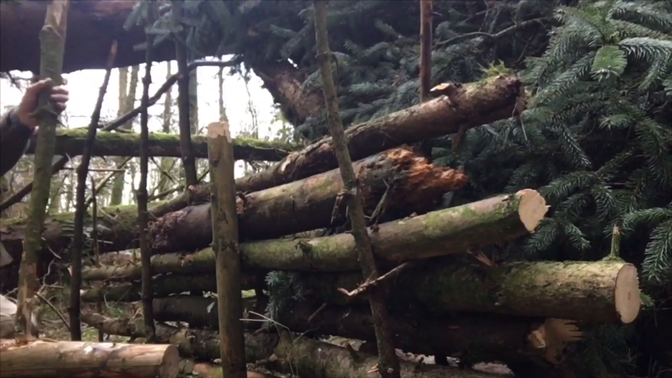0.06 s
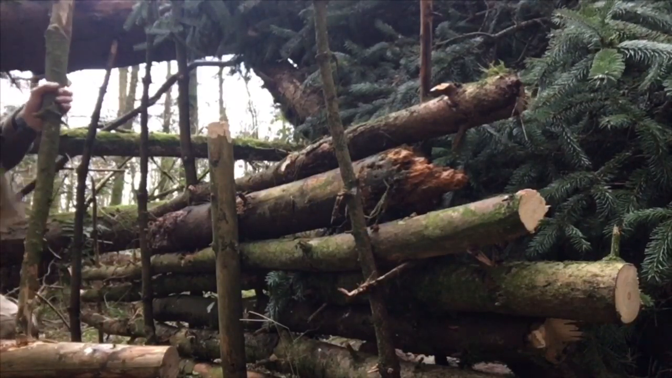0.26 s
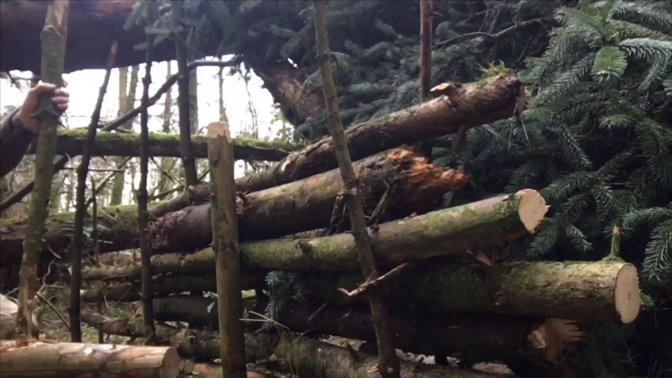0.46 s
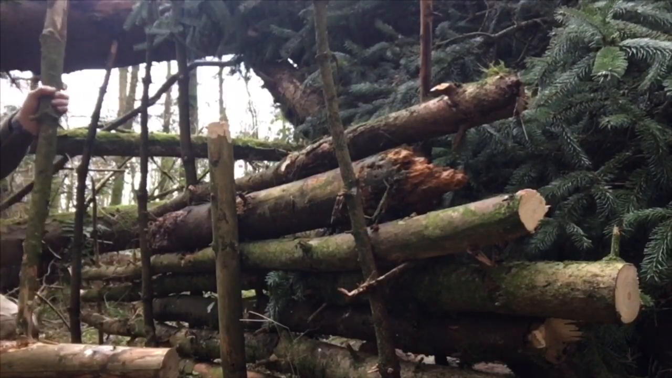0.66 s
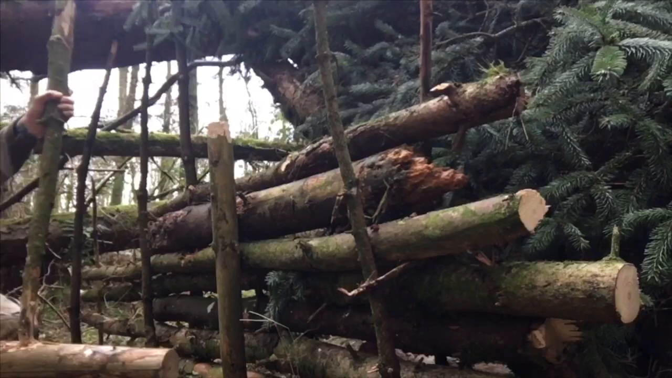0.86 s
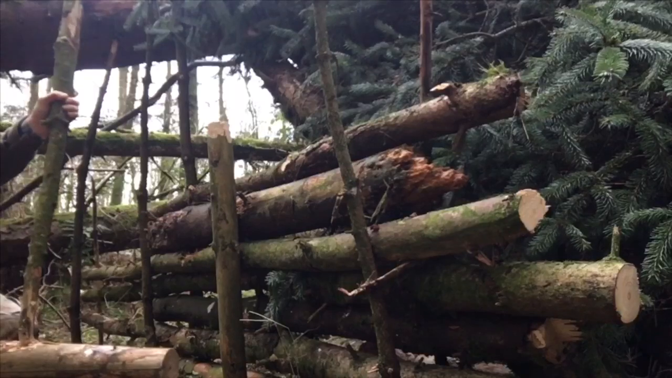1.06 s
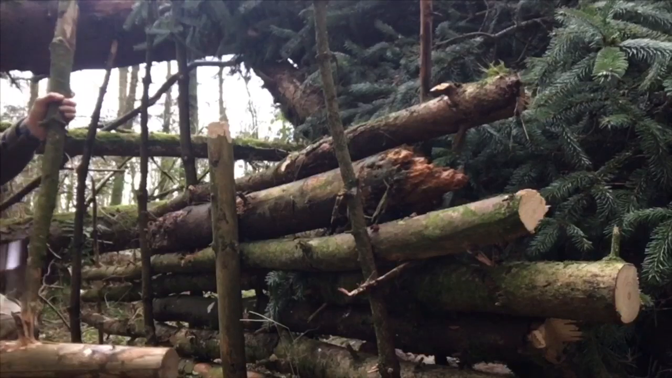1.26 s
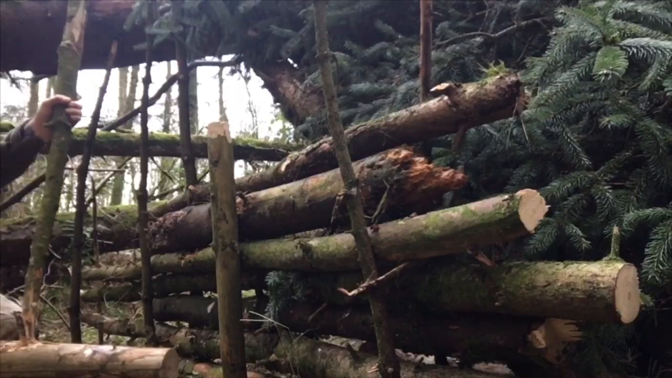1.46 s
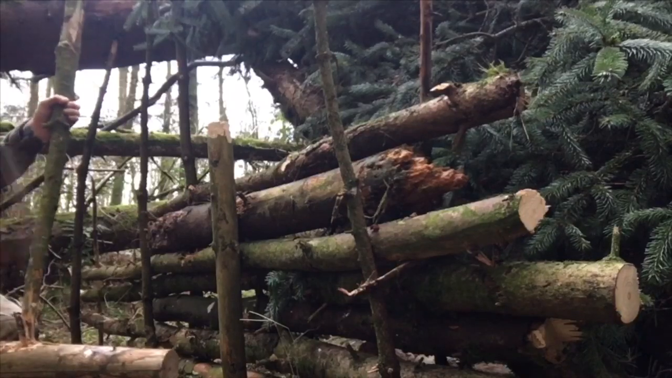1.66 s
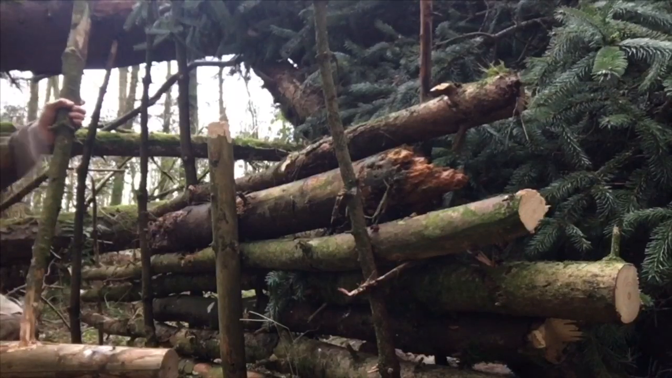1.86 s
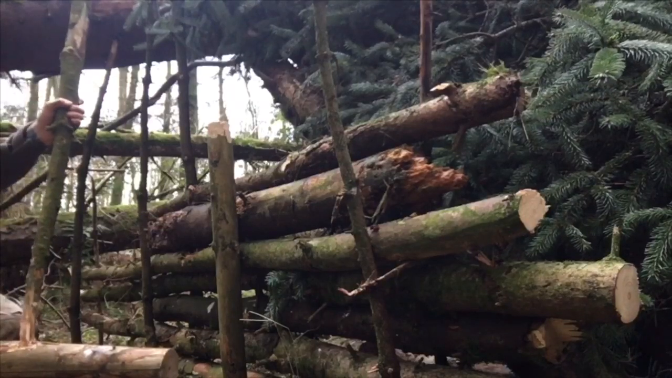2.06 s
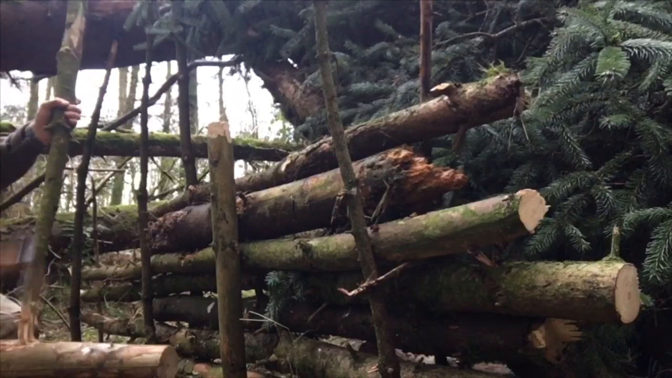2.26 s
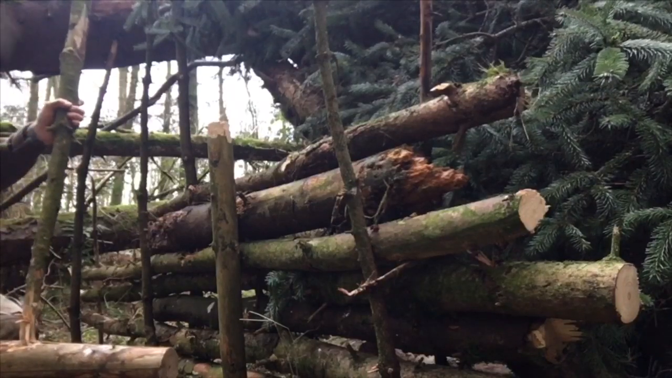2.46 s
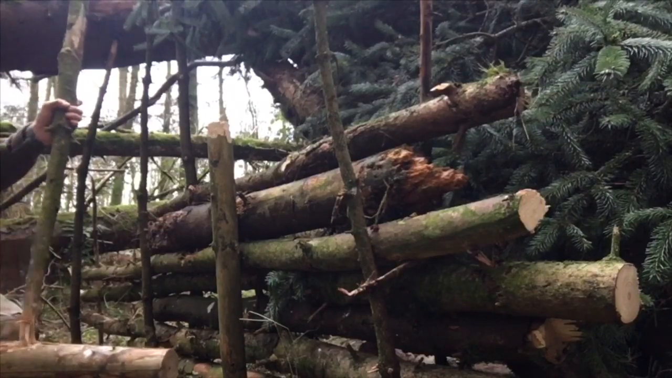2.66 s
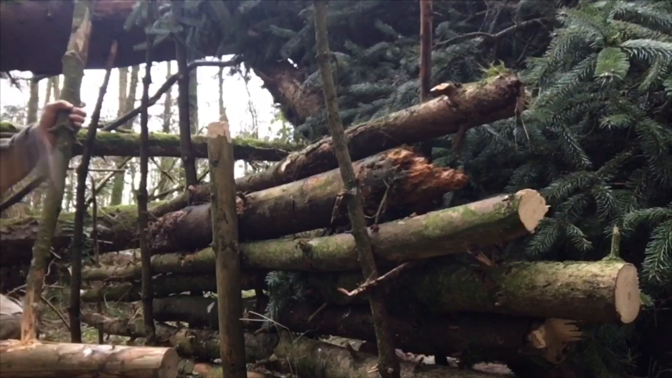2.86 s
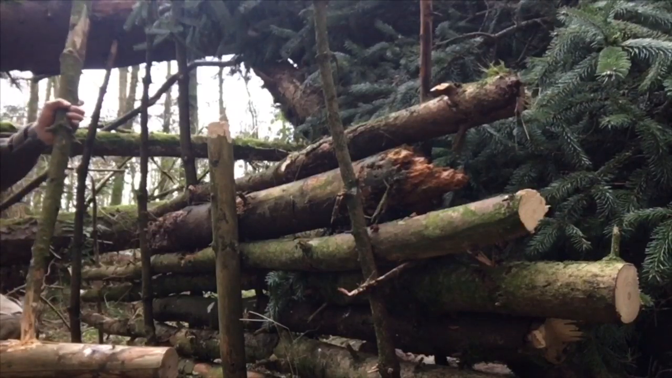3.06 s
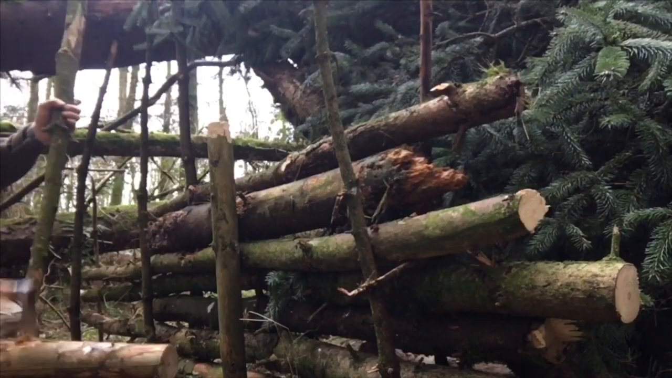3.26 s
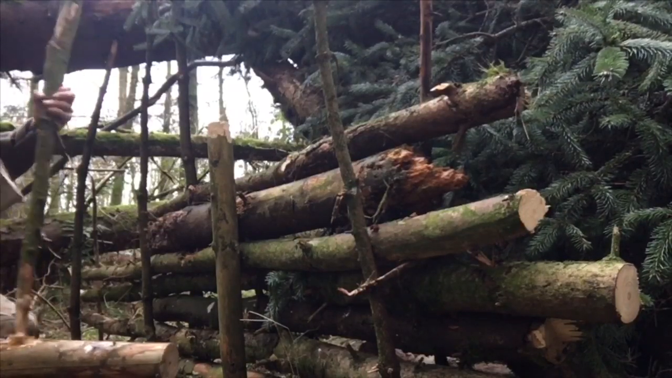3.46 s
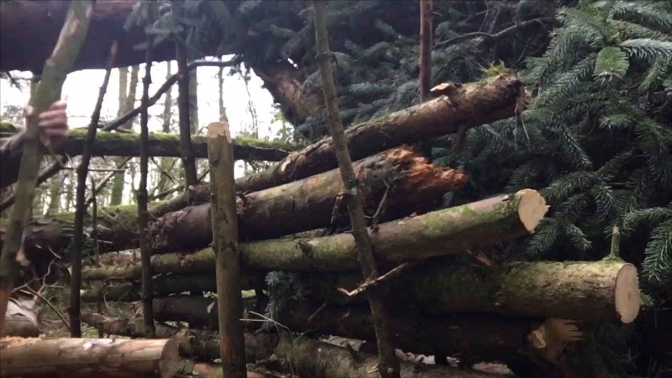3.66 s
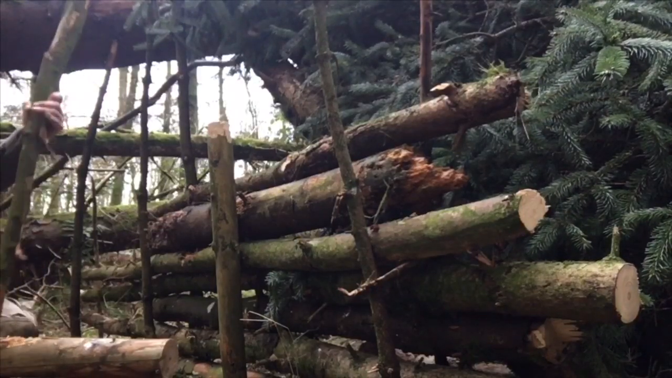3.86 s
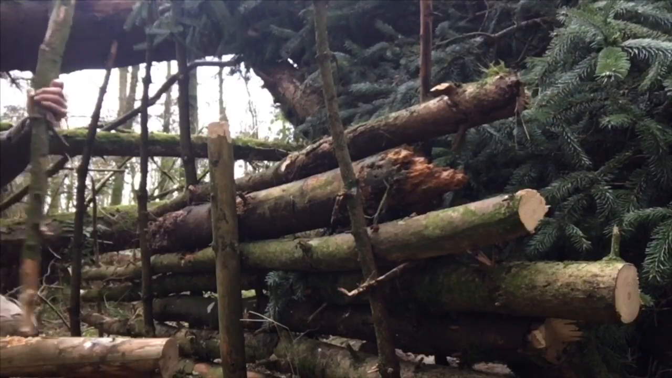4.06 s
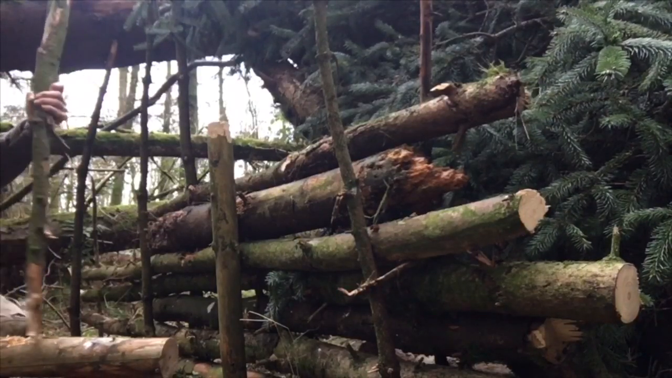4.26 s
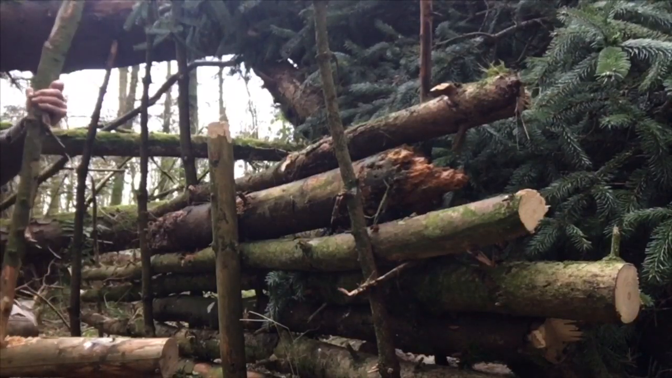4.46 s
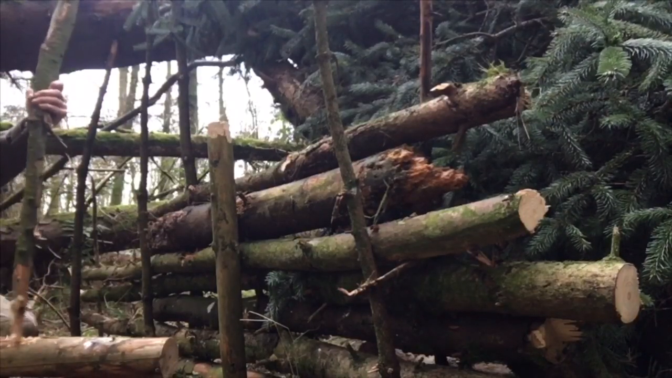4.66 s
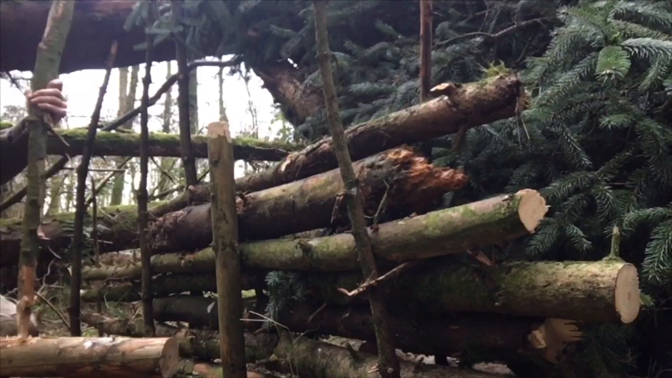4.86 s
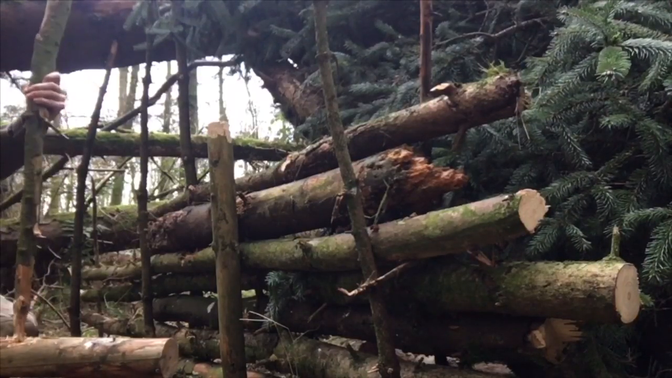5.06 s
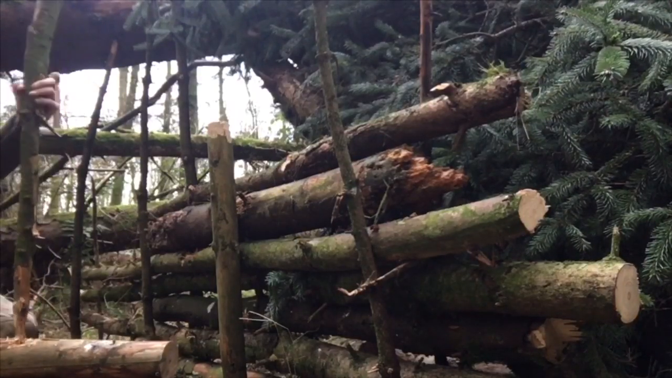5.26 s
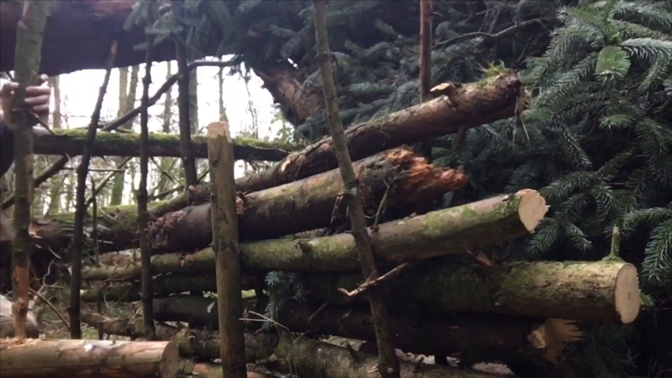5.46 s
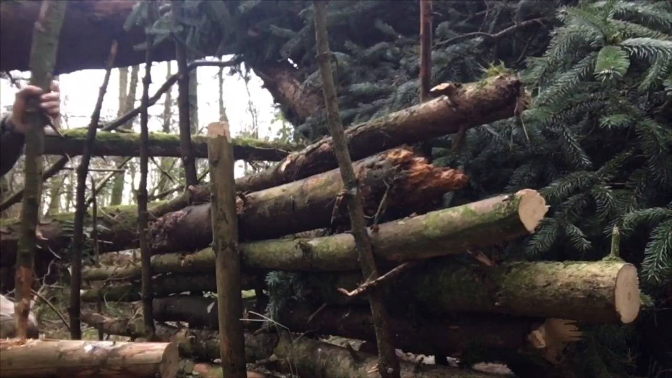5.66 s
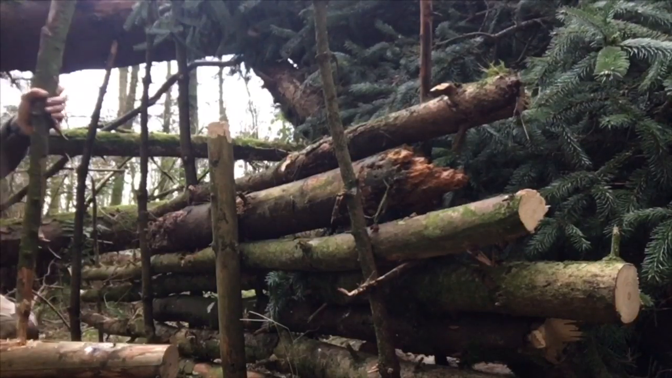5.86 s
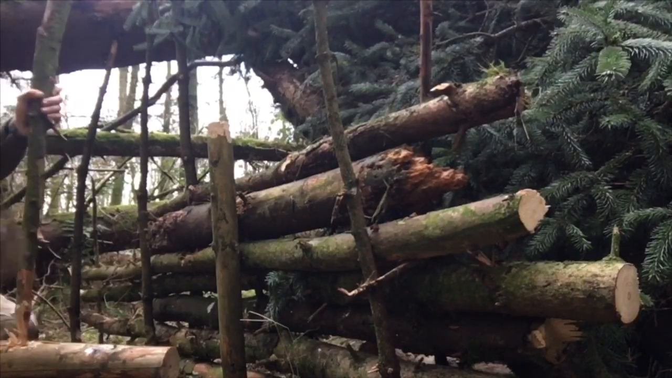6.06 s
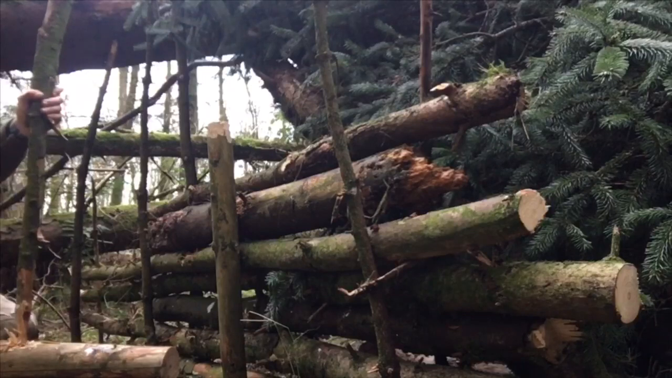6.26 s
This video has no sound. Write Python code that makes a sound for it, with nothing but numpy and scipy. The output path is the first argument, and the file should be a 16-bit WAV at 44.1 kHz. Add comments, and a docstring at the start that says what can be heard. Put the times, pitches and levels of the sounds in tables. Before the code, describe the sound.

A quiet woodland hush and low, uneven breeze rumble open the scene, with a soft puff at 0.3 s. A hatchet cuts a thin pole on a log at about 0.7, 1.2, 1.7, 2.2, 2.7 and 3.2 s. Each blow is brief and dry: a faint bark slide, bright fibre crunch and crack, then a short splinter tail. The first and sixth ring the pole most clearly, a hollow mid-pitched knock; others are duller and crunchier, the third slightly doubled. A soft ground thump follows. Wind buffets the microphone most around 1.2-1.4 s. After 3.3 s come small bark and twig ticks, a faint dull knock near 3.9, and quiet hand scuffs at 4.2, 4.7, 5.0 and 5.3-5.5. A much weaker chop lands at 5.93, then hush remains until about 6.3. Trees add only a very faint, diffuse tail.

```python
"""A hatchet points a thin pole that stands on a log in quiet woodland.
Each cut is coloured noise: a bark slide, a lumpy fibre crunch with bright cracks, then a splinter tail.
Knocks ring decaying sine modes of pole and log over a low push through the soil; trunks scatter the chops.
Between chops bark and twigs tick and the hand scuffs the pole, all as band-passed noise.
Behind lie a filtered-noise hush of trees and a breeze that rumbles, flutters and puffs on the microphone."""
import sys
import numpy as np
from scipy import signal
from scipy.fft import rfft, irfft
from scipy.io import wavfile

SR = 44100
rng = np.random.default_rng(int(sys.argv[2]) if len(sys.argv) > 2 else 0)


def waveform_to_disk(signal):
    """Save audio, clipped to [-1, 1], as 16-bit WAV at the path in sys.argv[1]."""
    frames = np.transpose(np.atleast_2d(signal))
    scaled = np.clip(frames, -1, 1) * 32767
    samples = np.round(scaled).astype(np.int16)
    wavfile.write(sys.argv[1], SR, samples)


N = 278271


def amp(db):
    """Turn dB into linear gain."""
    return 10 ** (np.asarray(db) / 20)


def rms_one(x):
    """Scale to rms 1."""
    return x / np.sqrt(np.mean(x ** 2) + 1e-20)


def colour(x, spectrum, tilt_db=0):
    """Shape a signal with a spectrum, tilted per octave about 1.5 kHz; the tilt stays level below 700 Hz."""
    hz = np.maximum(np.arange(len(x) // 2 + 1) * SR / len(x), 10)
    points = np.array(spectrum, float)
    shape_db = np.interp(np.log(hz), np.log(points[:, 0]), points[:, 1])
    tilt = tilt_db * np.log2(np.maximum(hz, 700) / 1500)
    return irfft(rfft(x) * amp(shape_db + tilt), len(x))


def drift(rate_hz):
    """Slow random wander of rms 1: noise through two equal one-pole low-passes."""
    r = np.exp(-2 * np.pi * rate_hz / SR)
    wander = signal.lfilter([1], [1, -2 * r, r * r], rng.standard_normal(N + SR))
    return rms_one(wander[SR:])  # the first second lets the filter settle


def add(out, start_s, x):
    """Mix a sound in at a time."""
    i = round(start_s * SR)
    out[i:i + len(x)] += x[:N - i]


def grit(count, lumps_db):
    """Noise whose level jumps every 32 samples, as fibres snap unevenly."""
    jumps = np.repeat(rng.standard_normal(count // 32 + 1), 32)[:count]
    return rng.standard_normal(count) * amp(lumps_db * jumps)


def band(x, hz, octaves):
    """Broad band-pass reaching this many octaves either side of its centre."""
    edges = np.clip([hz / 2 ** octaves, hz * 2 ** octaves], 50, .45 * SR)
    return signal.sosfilt(signal.butter(1, edges, "band", fs=SR, output="sos"), x)


def band_twice(x, hz, octaves):
    """The same band-pass applied twice, for steeper skirts."""
    return band(band(x, hz, octaves), hz, octaves)


def push(centre_s, peak_db, hz, width_s):
    """A low sine of a cycle or two under a bell-shaped swell; returns its start time and sound."""
    t = np.arange(-2048, 2048) / SR
    bell = np.exp(-(t / width_s) ** 2)
    return centre_s + t[0], amp(peak_db) * bell * np.sin(2 * np.pi * hz * t)


# spectrum of the far trees: pitch_hz, relative density_db (per Hz)
WOODLAND_SPECTRUM = [(90, -13), (150, -2), (300, -4.5), (700, -6.5), (1200, -10.5), (2300, -16),
                     (3000, -21), (4200, -25), (4900, -28), (6200, -28.5), (7600, -37.5), (10000, -41.5),
                     (14500, -44.5), (16300, -57)]
WOODLAND_DB = -63


def woodland():
    """Far, smooth hush of trees: shaped noise whose level wavers gently."""
    waver_db = .6 * drift(2)
    return amp(WOODLAND_DB + waver_db) * rms_one(colour(rng.standard_normal(N), WOODLAND_SPECTRUM))


# strength of the breeze, joined by straight lines: time_s, rumble_db (before its lumps)
BREEZE_STRENGTH = [(0.0, -63.5), (0.7, -60.5), (1.03, -60.5), (1.25, -41), (1.34, -53), (1.81, -63.5),
                   (2.16, -52.5), (2.3, -56), (2.44, -61), (2.97, -62), (3.14, -53.5), (3.37, -61.5),
                   (3.93, -56.5), (4.16, -62.5), (4.9, -64), (5.61, -59.5), (6.08, -55.5), (6.31, -62)]
# spectrum of the rumble: pitch_hz, relative density_db (per Hz)
RUMBLE_SPECTRUM = [(20, -8), (35, -1.5), (55, 14), (80, 5.5), (130, 0), (220, -19), (400, -52)]
# spectrum of the higher flutter: pitch_hz, relative density_db (per Hz)
FLUTTER_SPECTRUM = [(60, -32), (110, -5), (150, 1), (220, -6.5), (350, -45)]
CALM_DB, FLUTTER_DB = -56, -73.5  # calm rumble, and the middle flutter level at that strength
FLUTTER_FOLLOWS = 0.23  # flutter dB per dB of breeze strength


def breeze():
    """Air on the microphone port makes lumpy low noise, with a higher flutter that grows with the breeze."""
    gust_db = np.interp(np.arange(N) / SR, *np.transpose(BREEZE_STRENGTH))
    rumble_db = gust_db + 1.5 * drift(33)
    rumble = amp(rumble_db) * rms_one(colour(rng.standard_normal(N), RUMBLE_SPECTRUM))
    flutter_db = FLUTTER_DB + FLUTTER_FOLLOWS * (gust_db - CALM_DB) + 3.0 * drift(4)
    flutter = amp(flutter_db) * rms_one(colour(rng.standard_normal(N), FLUTTER_SPECTRUM))
    return rumble + flutter


# single puffs on the microphone port: centre_s, peak_db (of the swell), pitch_hz
PUFFS_OF_AIR = [(.295, -46, 73.6), (1.056, -48.5, 119.6), (1.17, -43.5, 174), (1.308, -37, 117),
                (1.449, -43.5, 170), (3.05, -48, 69), (3.112, -51.5, 88), (3.48, -46, 63.6),
                (3.741, -54, 109.4), (3.789, -49, 64)]
PUFF_CYCLES = 0.8  # half width of the swell


def puffs():
    """Separate soft thumps of air, each a short low sine under a bell-shaped swell."""
    out = np.zeros(N)
    for centre_s, peak_db, hz in PUFFS_OF_AIR:
        add(out, *push(centre_s, peak_db, hz, PUFF_CYCLES / hz))
    return out


# hand rubbing the bark: start_s, length_s, level_db (rms before the swell and fade), centre_hz
HAND_SCUFFS = [(4.194, 0.055, -63, 2210), (4.978, 0.054, -61.5, 2540), (4.71, 0.039, -72, 3960),
               (5.248, 0.021, -72, 5000), (5.274, 0.12, -64.5, 3220), (5.468, 0.059, -68.5, 4780)]


def scuffs():
    """The hand rubs bark: band-passed gritty noise that swells and fades."""
    out = np.zeros(N)
    for start_s, length_s, level_db, hz in HAND_SCUFFS:
        count = round(length_s * SR)
        rub = rms_one(band_twice(grit(count, lumps_db=4.0), hz, .7))
        add(out, start_s, amp(level_db) * np.hanning(count) * rub)
    return out


# bark grazes, chips landing and twig ticks:
# start_s, level_db (of the body, before rise and decay), centre_hz, click_db (against the body)
BARK_TICKS = [(.693, -40, 2030, -7), (1.201, -44, 1710, -11), (1.691, -43, 2090, -11),
              (1.786, -61.5, 3600, 7.5), (1.816, -61, 9000, -6), (2.186, -47.5, 1525, -10),
              (2.672, -45, 2005, -13), (2.680, -43.5, 1780, -11), (2.839, -61, 7000, -0.5),
              (2.92, -62, 7140, -3), (3.608, -53.5, 4130, -5), (3.648, -61, 3920, -19),
              (3.8413, -46, 2630, 4.5), (4.200, -63.5, 3920, -6.5), (4.221, -52.5, 1400, -7.5),
              (4.477, -61, 3870, -3.5), (4.496, -55, 3990, 3), (4.507, -42, 2510, -6.5),
              (4.569, -62, 4100, -10), (4.720, -59, 3700, -10.5), (4.991, -49.5, 1313, -11),
              (5.012, -61.5, 3500, -12), (5.472, -61.5, 4080, -3), (5.905, -53, 1910, -18),
              (5.999, -53, 1500, -2)]
TICK_OCTAVES, TICK_CYCLES = .25, 47  # half width of the resonance; cycles for the body's 60 dB decay
TICK_RISE_S, CLICK_T60_S = .0007, .025


def ticks():
    """Short snaps: a decaying woody noise resonance with a broad click on top."""
    out, t = np.zeros(N), np.arange(2048) / SR
    rise = np.minimum(t / TICK_RISE_S, 1)
    for start_s, level_db, hz, click_db in BARK_TICKS:
        noise = grit(len(t), lumps_db=2.0)
        body = amp(-60 * t * hz / TICK_CYCLES) * rms_one(band_twice(noise, hz, TICK_OCTAVES))
        click_fade = amp(click_db - 60 * t / CLICK_T60_S)
        click = click_fade * rms_one(colour(noise, WOOD_SPECTRUM, tilt_db=3.0))
        add(out, start_s, amp(level_db) * rise * (body + click))
    return out


TRUNKS_DB, TRUNKS_DELAY_S, TRUNKS_T60_S = -59.5, 0.19, 0.68


def trunks(x):
    """The trees around scatter the chops into a dull, late, diffuse tail: convolution with shaped noise."""
    t = np.arange(SR // 2) / SR
    scatter = rms_one(band(rng.standard_normal(len(t)), 410, 1.0)) * amp(-60 * t / TRUNKS_T60_S)
    scatter *= 1 - np.exp(-(t / TRUNKS_DELAY_S) ** 4)  # late build-up
    unit_scatter = scatter / np.sqrt(np.sum(scatter ** 2))
    return amp(TRUNKS_DB) * signal.fftconvolve(x, unit_scatter)[:N]


# blade touching, stopping and rebounding; the dB columns add to the levels of the parts below:
# start_s, pole_db, overtones_db, log_db, ground_db,
# free_share (part of the pole's free ring time left by the wedged blade, 0 to 1)
BLADE_KNOCKS = [(0.693, -44, -27.5, -29, -34.5, 0.99), (0.7253, 1.6, 0, -3, -5, 0.91),
                (1.201, -50, -32.5, -25.5, -34, 0.52), (1.228, -36.5, -9.5, -17, -1.5, 0.82),
                (1.687, -52.5, -30.5, -30, -33, 1), (1.7244, -9.5, 10.5, 3.5, -2.1, 0.56),
                (1.7280, -6.5, -17.5, -11, -15, 0.46), (1.764, -31.5, -32, -40, -36.5, .99),
                (2.2130, -25, -10, -13.5, -5, .9), (2.678, -51.5, -19, -24, -40, .7),
                (2.707, -20, -0.5, 2, 0, .8), (2.7257, -17.5, -17, -27, -22, 1),
                (3.215, -3.5, -3, -2, -3.5, 0.88), (3.8930, -39.5, -31.5, -41, -26, 1),
                (5.934, -31, -12.5, -22, -18, 1)]
# main modes of the pole: pitch_hz, level_db, t60_s (ringing free)
POLE_MODES = [(568, -1, 0.097), (583, -13.5, 0.028)]
# overtones of the pole: pitch_hz, level_db, t60_s (ringing free)
POLE_OVERTONES = [(690, -25, .035), (768, -26, 0.045), (944, -23, 0.069), (1038, -25, 0.064),
                  (1324, -23, .045), (1793, -27, 0.047), (2700, -34, 0.015)]
# modes of the log: pitch_hz, level_db, t60_s
LOG_MODES = [(221, -25, 0.14), (250, -19, 0.05), (290, -8.5, 0.045), (355, -24, 0.1), (449, -26, .04)]
KNOCK_RISE_S, KNOCK_RISE_CYCLES = 0.0014, 0.056  # added together for each mode's rise
GROUND_HZ, GROUND_DB, GROUND_LAG_S, GROUND_WIDTH_S = 78.6, -26.5, .018, 0.011  # soft push through the soil


def ring(out, start_s, modes, strength_db, free_share):
    """Each struck mode is a sine that swells quickly and decays exponentially."""
    t = np.arange(SR // 2) / SR
    for hz, level_db, t60_s in modes:
        swell = 1 - np.exp(-t / (KNOCK_RISE_S + KNOCK_RISE_CYCLES / hz))
        decay_db = -60 * t / (t60_s * free_share)
        add(out, start_s, swell * amp(strength_db + level_db + decay_db) * np.sin(2 * np.pi * hz * t))


def knocks():
    """Each contact of the blade rings the modes of pole and log; the ground answers a moment later."""
    out = np.zeros(N)
    for start_s, pole_db, overtones_db, log_db, ground_db, free_share in BLADE_KNOCKS:
        ring(out, start_s, POLE_MODES, pole_db, free_share)
        ring(out, start_s, POLE_OVERTONES, overtones_db, free_share)
        ring(out, start_s, LOG_MODES, log_db, 1)  # the blade does not damp the log
        add(out, *push(start_s + GROUND_LAG_S, GROUND_DB + ground_db, GROUND_HZ, GROUND_WIDTH_S))
    return out


# thick fibres cracking during a cut: start_s, peak_db, centre_hz (of the first, narrower band)
FIBRE_CRACKS = [(0.7207, -23.5, 5820), (0.725, -19.5, 6830), (1.2249, -16.5, 4000), (1.7090, -14.5, 7210),
                (1.725, -22.5, 6970), (2.2054, -20, 5890), (2.212, -15, 3950), (2.7, -16.5, 4450),
                (2.702, -32, 3500), (3.2078, -11.5, 4440), (3.2137, -8, 4520), (5.9345, -50, 7030)]


def cracks():
    """Thick fibres give bright snaps: noise bursts that die within milliseconds, band-passed."""
    out, t = np.zeros(N), np.arange(512) / SR
    for start_s, peak_db, hz in FIBRE_CRACKS:
        burst = rng.standard_normal(len(t)) * amp(-60 * t / .003)
        snap = band_twice_apart = band(band(burst, hz, 0.45), 3000, 1.3)
        add(out, start_s, amp(peak_db) * snap / np.max(np.abs(snap)))
    return out


# blade cutting fibres: start_s, length_s, level_db (crunch rms before bite and growth),
# growth_db (over the cut), tilt_db (per octave), slide_s (bark slide just before the cut)
BLADE_CUTS = [(0.7189, 0.0049, -23.5, 9, -4.5, .02), (1.2191, 0.0064, -23, 3.8, 1.13, 0.02),
              (1.7076, 0.019, -22, 2, -4, 0.018), (2.2036, 0.0062, -22.5, 6, -0.3, .018),
              (2.6952, 0.011, -19.5, 1.5, -2.5, .018), (3.2041, 0.0098, -23, 7.5, -3.5, 0.025),
              (5.93, 0.0092, -33, 9, 0.5, 0.021)]
# spectrum of fibre crunch, also of the clicks in the ticks: pitch_hz, relative density_db (per Hz)
WOOD_SPECTRUM = [(60, -43.5), (200, -23.5), (450, 7.5), (900, 4.5), (1400, 10), (1900, 5), (2600, 7),
                 (3200, 2.5), (4400, 2), (5200, -1), (6200, -5), (10000, -14.5), (13000, -18.5),
                 (16000, -17.5)]
BITE_S, CRUNCH_T60_S = 0.00053, 0.026
SPLINTER_DB, SPLINTER_T60_S = -16.5, .097  # level against the crunch
SLIDE_DB, SLIDE_GROWTH_DB = -28.5, 10.5  # level at the slide's end against the cut's level_db; swell up to it


def cuts():
    """The blade slides over bark, then crunches while it travels; splinters leave a longer tail."""
    out, t = np.zeros(N), np.arange(8192) / SR
    for start_s, length_s, level_db, growth_db, tilt_db, slide_s in BLADE_CUTS:
        after_s = np.maximum(t - length_s, 0)
        bite = np.minimum(t / BITE_S, 1) * amp(level_db + growth_db * np.minimum(t / length_s, 1))
        crunch = rms_one(colour(grit(len(t), lumps_db=4.5), WOOD_SPECTRUM, tilt_db))
        crunch *= amp(-60 * after_s / CRUNCH_T60_S)
        tail = rms_one(colour(rng.standard_normal(len(t)), WOOD_SPECTRUM, tilt_db + 0.2))
        tail *= amp(SPLINTER_DB - 60 * after_s / SPLINTER_T60_S)
        add(out, start_s, bite * (crunch + tail))

        rub = rms_one(band_twice(rng.standard_normal(len(t)), 2400, 0.85))
        swell_db = SLIDE_GROWTH_DB * (np.minimum(t / slide_s, 1) - 1)
        add(out, start_s - slide_s, amp(level_db + SLIDE_DB + swell_db) * rub * (t < slide_s))
    return out


def scene():
    """All sources, mono; only the chops are scattered by the trunks."""
    background = woodland() + breeze() + puffs()
    handling = scuffs() + ticks()
    chops = knocks() + cracks() + cuts()
    return (background + handling + trunks(chops) + chops)[None]


# treble dips of the microphone: centre_hz, width_hz, share (taken out at the centre, 0 to 1)
TREBLE_DIPS = [(3150, 500, 0.33), (5050, 820, 0.48)]
TOP_STOP_HZ = 16600  # 70 dB down from here up


def record(dry):
    """The microphone drops the deepest bass and has two treble dips; the top is cut."""
    lean = signal.sosfilt(signal.butter(3, 38, "high", fs=SR, output="sos"), dry)
    for hz, width_hz, share in TREBLE_DIPS:
        peak = signal.lfilter(*signal.iirpeak(hz, hz / width_hz, fs=SR), lean)
        lean = lean - share * peak
    return signal.sosfilt(signal.cheby2(12, 70, TOP_STOP_HZ, fs=SR, output="sos"), lean)


dry = scene()
out = record(dry)
waveform_to_disk(out)
```